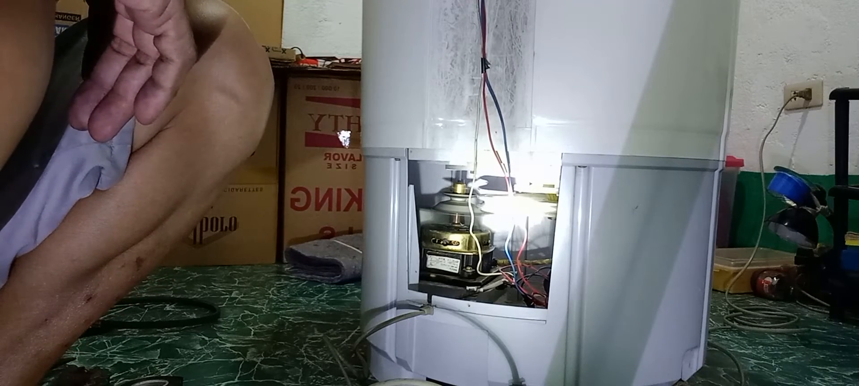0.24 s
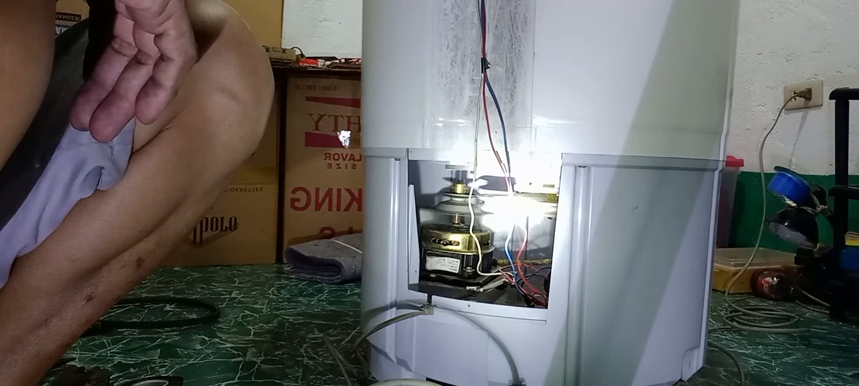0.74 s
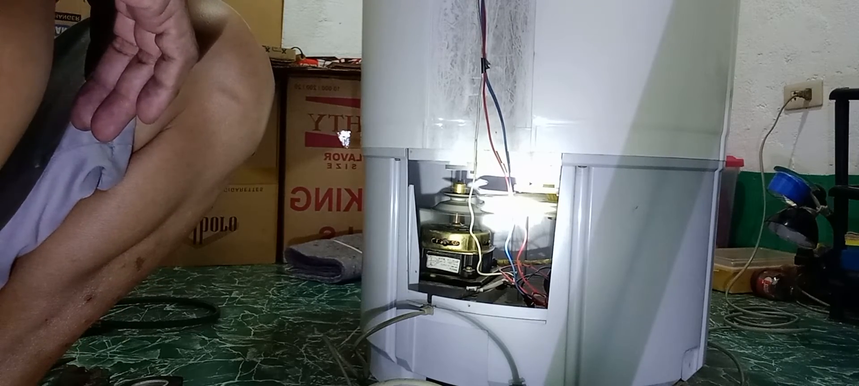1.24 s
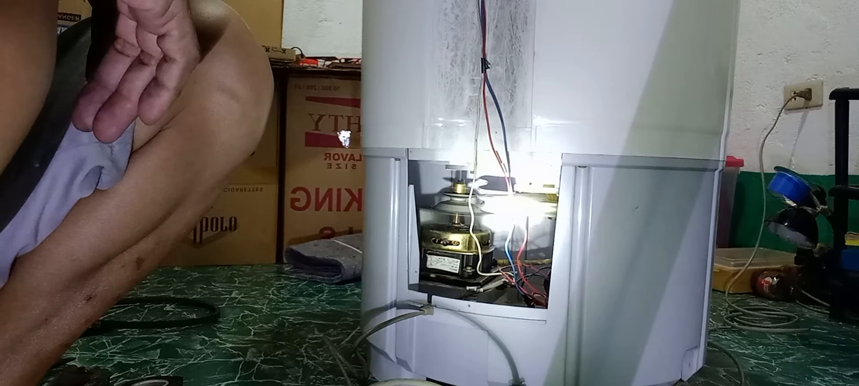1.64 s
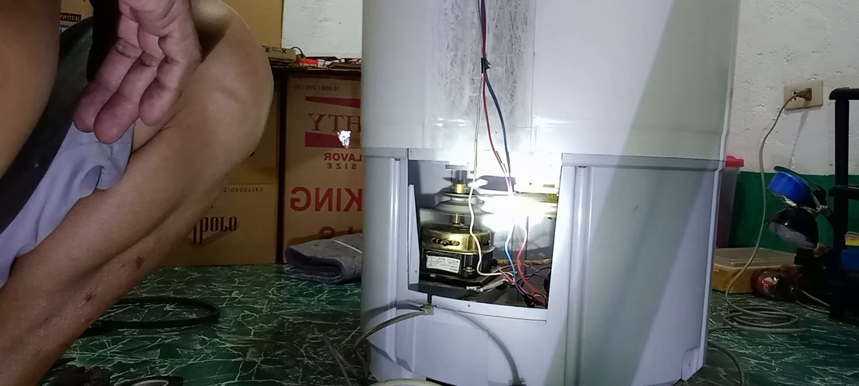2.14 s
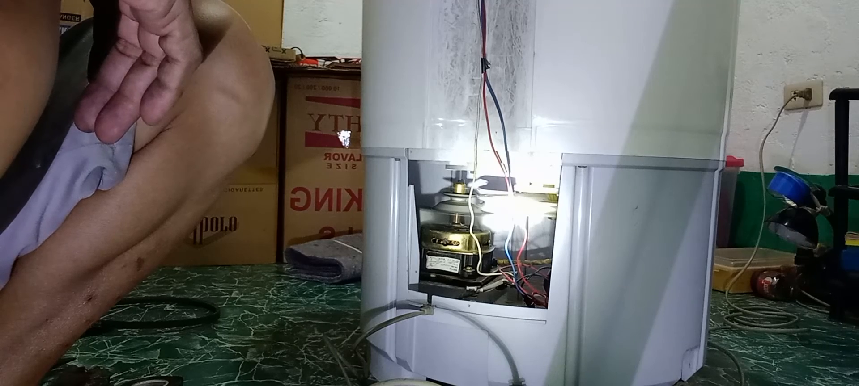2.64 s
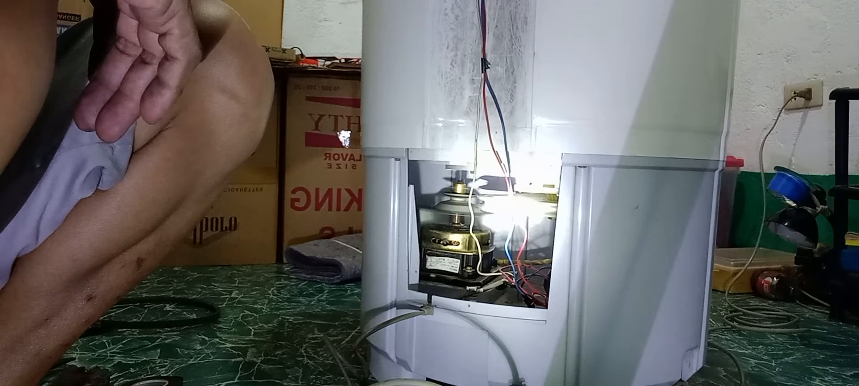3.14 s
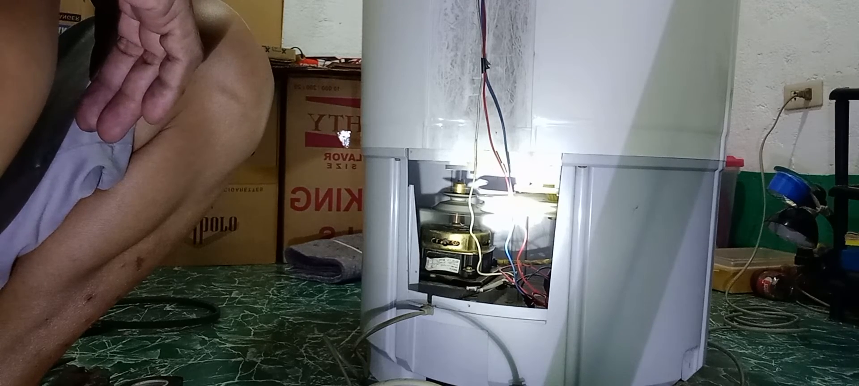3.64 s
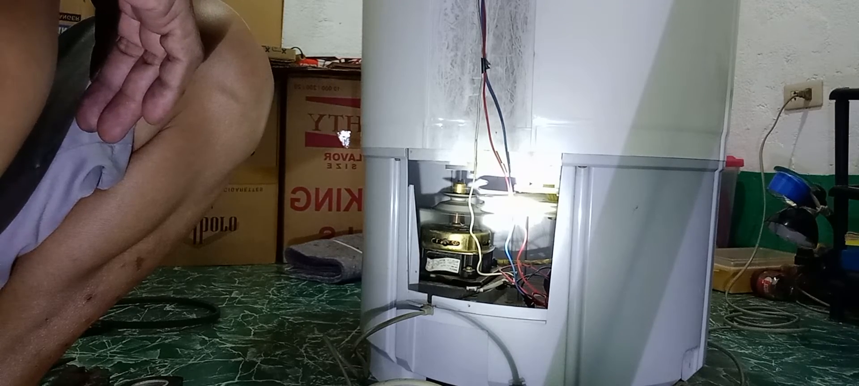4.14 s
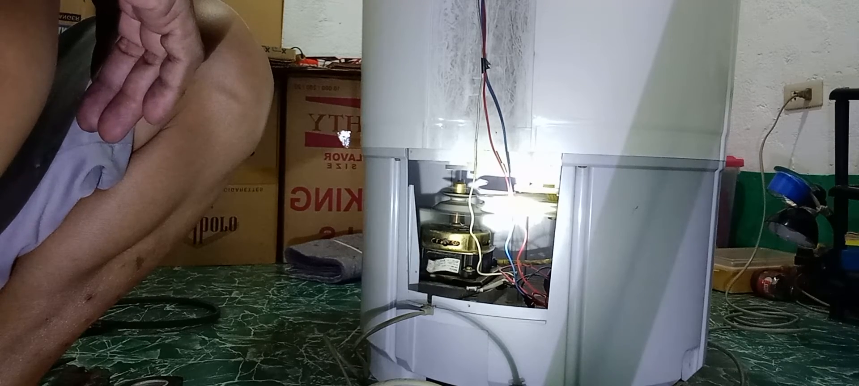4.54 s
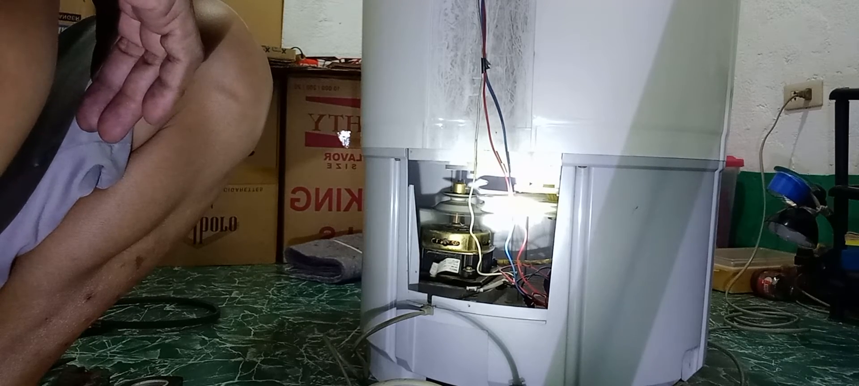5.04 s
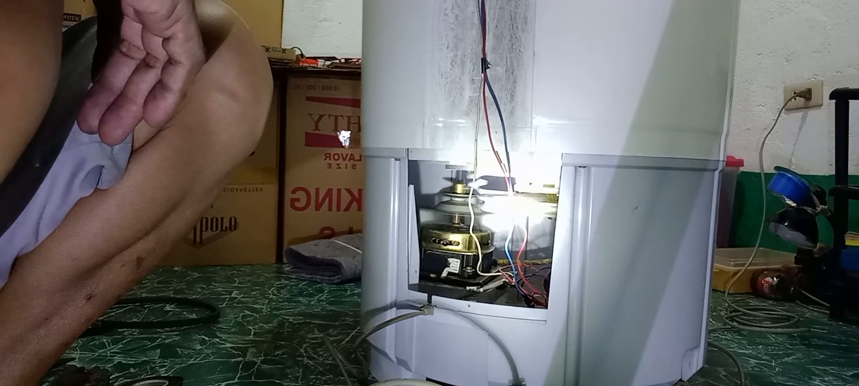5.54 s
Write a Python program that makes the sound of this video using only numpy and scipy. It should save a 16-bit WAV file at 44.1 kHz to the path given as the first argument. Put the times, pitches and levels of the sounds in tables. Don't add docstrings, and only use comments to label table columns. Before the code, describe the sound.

From 0 to about 2.75 seconds a bare washer motor, close and centred, hums deep and steady near 120 Hz, with weaker harmonics and a lightly pulsing bearing and fan whirr. Small dry ticks appear near 0.85 and 0.95 seconds, with fainter ones later. At 2.75 the power cuts: the hum collapses into a short, beating panel ring of about a third of a second, while a soft low whirr coasts down. Now a vehicle outside is heard, its slipping belt making fast downward chirps around 1.3 to 1.7 kHz, echoed by street walls, with a short loud squeal near 3.85. Engine drone wanders low beneath. Faint high brake squeaks come around 3.3, 3.8 and 4.0, with a clearer one at 4.5. After about 4.1 the vehicle rises sharply, the chirps quickening, road rumble booming in the shop and tyre hiss spreading wide, closest from 5.2 to the end near 5.8. The motor does not restart.

```python
import sys
import numpy as np
from scipy import signal
from scipy.fft import next_fast_len
from scipy.io import wavfile
from scipy.ndimage import uniform_filter1d

SR = 44100
rng = np.random.default_rng(int(sys.argv[2]) if len(sys.argv) > 2 else 0)


def to_linear_factor(level_db):
    exponent = np.asarray(level_db, float) / 20
    return 10 ** exponent


def unload_audio(sound):
    columns = np.transpose(np.atleast_2d(sound))
    steps = np.round(np.clip(columns, -1, 1) * 32767)
    wavfile.write(sys.argv[1], SR, steps.astype(np.int16))


N = 255780
T = np.arange(N) / SR
HUM_HZ = 119.83
POWER_OFF_S = 2.756

# t/s, level/dB compared with about its closest
APPROACH = [
    (0, -23),
    (2.8, -23),
    (3.5, -23.5),
    (3.9, -24.5),
    (4.16, -14.5),
    (4.55, -6),
    (4.85, -3),
    (5.22, 1),
    (5.8, 1.5),
]


def rms_one(x):
    return x / np.sqrt(np.mean(x ** 2) + 1e-20)


def in_time(rows):
    seconds, *columns = np.transpose(rows)
    return [np.interp(T, seconds, column) for column in columns]


def at_hz(points, hz):
    table_hz, value = np.array(points).T
    return np.interp(np.log(hz), np.log(table_hz), value)


def bell(centre_s, half_s):
    return np.exp(-((T - centre_s) / half_s) ** 2)


def drift(rate_hz):
    r = np.exp(-80 * np.pi * rate_hz / SR)
    white = rng.standard_normal(N // 40 + 2002)
    slow = signal.lfilter([1], [1, -2 * r, r * r], white)[2000:]
    return np.interp(np.arange(N) / 40, np.arange(len(slow)), rms_one(slow))


def resonate(x, hz, width_hz):
    r = np.exp(-np.pi * width_hz / SR)
    feed = np.array([1, 0, -1]) * (1 - r * r) / 2
    back = [1, -2 * r * np.cos(2 * np.pi * hz / SR), r * r]
    return signal.lfilter(feed, back, x + 1e-18)


def whistle(hz, width_hz, shape):
    once = resonate(rng.standard_normal(shape), hz, width_hz)
    return rms_one(resonate(once, hz, width_hz))


def pair(mid, side, alike):
    alike = np.clip(alike, 0, 1)
    shared = np.sqrt(1 + alike) * mid
    unshared = np.sqrt(1 - alike) * side * [[1], [-1]]
    return (shared + unshared) / np.sqrt(2)


def bands():
    edges = 30 * 2 ** np.arange(0, 9.2, 1 / 3)
    white = rng.standard_normal((2, 2, N))
    for k, (low, high) in enumerate(zip(edges, edges[1:])):
        band = signal.butter(2, [low, high], "band", fs=SR, output="sos")
        mid, side = signal.sosfilt(band, white[k % 2])
        flicker = to_linear_factor(1.7 * drift(51.0))
        yield np.sqrt(low * high), mid, side, flicker


def after_cut(t60_s):
    return to_linear_factor(-60 * np.maximum(T - POWER_OFF_S, 0) / t60_s)


def motor():
    # hum multiple, shaft multiple, level/dB rms, wobble/dB
    hum_lines = [(1, 0, -9.5, -0.07), (1, 1, -30, 0.5), (2, -1, -46.5, 3), (1, 4, -48, -1.5),
                 (2, 0, -54.5, 6.5), (2, 1, -41, -0.5), (2, 2, -50, 3.5), (3, -1, -44.5, -3),
                 (3, 0, -31.5, 0.7), (3, 1, -50.5, 2.5), (3, 2, -49.5, 3), (4, -1, -49.5, 4),
                 (4, 0, -50.5, 3.5), (4, 1, -50.5, 3.5), (5, -1, -59.5, 4), (5, 0, -65.5, 2.5),
                 (5, 1, -57.5, 0), (6, -2, -63, -1.5), (6, -1, -65, 7.5), (6, 0, -63, 3.), (7, -3, -58, 2.),
                 (7, -2, -60, 3.), (7, -1, -66, 3.), ]
    hum_lines = hum_lines + [(7, 0, -47.5, 1.5), (7, 1, -62, 3.), (8, 0, -68, 3.)]
    # f/Hz, share, 60 dB fade time t/s
    panels = [(96.6, 0.53, 0.35), (120.5, 0.55, 0.24)]
    shaft_hz = 29.53
    since_cut = np.maximum(T - POWER_OFF_S, 0)
    out = np.zeros((2, N))
    for hum, shaft, level_db, wobble_db in hum_lines:
        hz = hum * HUM_HZ + shaft * shaft_hz
        if hz == HUM_HZ:
            held = 2 * np.pi * hz * np.minimum(T, POWER_OFF_S) + .14
            line = np.zeros(N)
            for panel_hz, share, t60_s in panels:
                line += share * after_cut(t60_s) * np.sin(held + 2 * np.pi * panel_hz * since_cut)
            line = np.array([line, line])
        else:
            phase = 2 * np.pi * hz * T + rng.uniform(0, 2 * np.pi)
            skew = (hz / 900) ** 2 * rng.uniform(-1.3, 1) * np.array([[1], [-1]])
            fade = to_linear_factor(-60 * np.maximum(T - POWER_OFF_S + .02, 0) / .17)
            line = fade * np.sin(phase + .05 * hum * drift(2.5) + skew)
        out += np.sqrt(2) * to_linear_factor(level_db + wobble_db * drift(9.1)) * line
    return out * to_linear_factor(np.array([[.45], [-.45]]))


def whirr(noise):
    # f/Hz, level/dB per Hz
    spectrum = [(30, -49), (55, -23.5), (75, -5.5), (130, -3.5), (200, -17.5), (300, -27.5), (450, -20),
                (560, -32.5), (900, -22), (1150, -38.5), (2100, -45.5), (3000, -42), (5500, -49.5),
                (8000, -67.5)]
    # f/Hz, left-right likeness (0-1)
    likeness = [(30, 0.47), (60, 1), (250, 0.44), (600, 0.81), (1400, 0.29), (6000, 0.079), (15000, 0.039)]
    # f/Hz, width/Hz, level/dB
    frame_peaks = [(1730, 250, -59.5), (2513, 170, -64.5), (3880, 660, -67.5), (4570, 950, -74.5),
                   (7600, 700, -87)]
    stop_t60_s, coast_t60_s = 0.14, 2.5
    broad = 0
    for hz, mid, side, flicker in noise:
        broad = broad + to_linear_factor(at_hz(spectrum, hz)) * flicker * pair(mid, side, at_hz(likeness, hz))
    broad = to_linear_factor(-38.5) * rms_one(broad)
    frame = sum(to_linear_factor(db) * pair(*whistle(hz, width, (2, N)), 0.79) for hz, width, db in frame_peaks)
    pulse = 1 + 0.14 * np.sin(2 * np.pi * HUM_HZ * T)
    low_band = signal.butter(3, [170, 550], "band", fs=SR, output="sos")
    lows = signal.sosfilt(low_band, broad)
    coast = to_linear_factor(5.5) * lows * after_cut(coast_t60_s) * (1 - after_cut(stop_t60_s))
    return (broad + frame) * after_cut(stop_t60_s) * pulse + coast


def belt():
    # t/s, turns done
    pulley = [(0, -33.6), (2.798, 0), (3.141, 4), (3.797, 12), (4.16, 17), (4.5, 22), (5.055, 30),
              (5.423, 35), (5.858, 41)]
    # share of turn, centre pitch (0-1), level/dB
    chirp = [(0, .95, -7), (.1, .85, -1), (.3, .55, 0), (.5, .35, 0), (.7, .2, -3), (.8, .2, -14),
             (.93, .2, -13), (1, .95, -7)]
    # centre t/s, half length t/s, level/dB
    hard_slips = [
        (2.976, .22, -0.5),
        (3.849, .09, 5),
    ]
    # centre t/s, half length t/s, level/dB
    grip = (3.48, .25, -5)
    # f/Hz, width/Hz, level/dB
    cover = [(1367, 150, 4), (1650, 270, 0.5)]
    # delay t/s, level/dB
    echoes = [(.009, -5), (.016, -7), (.027, -10), (.041, -14), (.083, -14)]

    turns, = in_time(pulley)
    turn = turns % 1
    hard = sum(bell(s, half) ** 2 for s, half, db in hard_slips)
    low_hz = 1300 + (1530 - 1300) * hard
    turns_per_s = uniform_filter1d(np.gradient(turns) * SR, size=SR // 4)
    high_hz = 1710 + 35.67 * (turns_per_s - 12)

    share, pitch, chirp_db = np.transpose(chirp)
    stroke = 5 * turn % 1
    sweep = 1.3 + (.2 - 1.3) * hard
    place = np.interp(turn, share, pitch) + sweep * (.5 - stroke) + .08 * drift(25)
    hz = low_hz + (high_hz - low_hz) * np.clip(place, 0, 1) + 20 * drift(60)
    phase = 2 * np.pi * np.cumsum(hz) / SR

    stroke_db = -4 * np.cos(2 * np.pi * stroke) + 2 * drift(70)
    overtone = np.sin(2 * phase) * np.cos(np.pi * (turn - .28)) ** 6
    octave = to_linear_factor(-2) * resonate(overtone, 3220, 200)
    tone = to_linear_factor(np.interp(turn, share, chirp_db) + stroke_db) * (np.sin(phase) + octave)
    tone = tone + sum(to_linear_factor(db + 5.5) * resonate(tone, ring_hz, width) for ring_hz, width, db in cover)

    walls = rng.standard_normal((2, SR // 3)) * to_linear_factor(-34 - 60 * T[:SR // 3] / .3)
    walls[:, 0] = 1
    for delay_s, db in echoes:
        samples = (delay_s * SR * np.array([1, 1.19])).astype(int)
        walls[[0, 1], samples] = to_linear_factor(db)
    heard = signal.fftconvolve(tone[None], walls, axes=1)[:, :N]

    near_db, = in_time(APPROACH)
    level_db = -36.5 + 0.84 * near_db
    level_db = level_db + sum(db * bell(s, half) for s, half, db in hard_slips + [grip])
    return to_linear_factor(level_db) * rms_one(heard)


def drone():
    # f/Hz, pitch wander/Hz
    engine_tones = [(76, 8.5), (116, 15), (153, 11)]
    tone_levels = [-29, -24, -31.5]
    # centre t/s, half length t/s, level/dB
    tone_surges = [
        [(3.19, 0.091, 2), (3.88, 0.19, 1.5), (4.13, 0.043, 2), (4.32, 0.051, -3), (4.67, 0.067, 3.5),
         (4.8, 0.047, -3), (4.97, 0.14, -3), (5.47, 0.03, -2), (5.7, 0.048, -5)],
        [(2.97, 0.025, 4), (3.13, .06, 0), (3.25, 0.069, -5), (3.88, 0.019, 7), (4.23, 0.019, -5),
         (4.66, 0.063, 0.5), (4.78, 0.034, 4), (4.97, 0.055, 5.5), (5.16, 0.054, -3.5), (5.31, 0.018, -4),
         (5.6, .07, -4)],
        [(3.31, 0.066, -7), (3.7, 0.022, -7), (3.92, 0.17, 4), (4.28, 0.064, 0.5), (4.46, 0.1, 0),
         (4.9, 0.084, -4), (5.2, .1, 1), (5.37, 0.017, 2.5), (5.65, 0.047, -1)],
    ]
    near_db, = in_time(APPROACH)
    out = 0
    for (hz, wander_hz), level_db, surges in zip(engine_tones, tone_levels, tone_surges):
        lumps = to_linear_factor(-12) + sum(to_linear_factor(db) * bell(s, half) for s, half, db in surges)
        wave = signal.hilbert(whistle(hz, wander_hz, (2, next_fast_len(N))))[:, :N]
        steady = np.sqrt(2) * wave.real / (np.abs(wave) + .2)
        out = out + to_linear_factor(level_db + 0.74 * near_db) * lumps * pair(*steady, .97)
    return out * to_linear_factor(np.array([[1.1], [-1.1]]))


def street(noise):
    # f/Hz, level/dB per Hz
    spectrum = [(30, -54.5), (52, -41), (72, -10), (120, -9), (180, -13), (330, -26.5), (500, -24),
                (1200, -31.5), (2000, -31.5), (4000, -43), (6500, -48.5), (12000, -50), (15600, -48)]
    # f/Hz, left-right likeness (0-1)
    likeness = [(60, 1), (130, 0.88), (290, 0.93), (640, 0.15), (1400, 0.17), (3000, 0.033), (15000, 0.018)]
    # level/dB at the closest, share of the approach followed
    regions = [(-1.5, 0.67), (-1.5, 0.57), (3.5, 0.88), (0.2, 0.72)]
    # f/Hz, width/Hz, level/dB
    shop_booms = [(192.5, 49, -15.5), (230.5, 11, -7.5), (276, 41, -9), (331.6, 48, -8), (472, 75, -12.5)]
    # f/Hz, width/Hz, level/dB compared with the hiss
    tyre_peaks = [(3940, 150, -7.5), (7800, 270, -11), (9600, 230, -9), (12300, 350, -10.5)]
    road_db, tyre_db = -27, -57
    near_db, = in_time(APPROACH)
    swell_db = np.array([db + share * near_db for db, share in regions])
    road, boom, power = 0, 0, 0
    for hz, mid, side, flicker in noise:
        place = np.interp(np.log(hz), np.log([150, 420, 1100, 7500]), [0, 1, 2, 3])
        weights = np.maximum(1 - np.abs(place - np.arange(4)), 0)
        level = to_linear_factor(at_hz(spectrum, hz) + weights @ swell_db)
        road = road + level * flicker * pair(mid, side, at_hz(likeness, hz))
        power += to_linear_factor(2 * at_hz(spectrum, hz)) * np.var(mid)
    road = road * to_linear_factor(-4.0 + road_db) / np.sqrt(power)
    for hz, width, db in shop_booms:
        boom = boom + to_linear_factor(db + 0.5 - 5.0 + swell_db[1]) * pair(*whistle(hz, width, (2, N)), 1.0)
    rings = sum(to_linear_factor(db + tyre_db + swell_db[3]) * whistle(hz, width, (2, N)) for hz, width, db in tyre_peaks)
    return (road + to_linear_factor(road_db) * boom) * to_linear_factor(np.array([[.8], [-.8]])) + rings


def brake_squeaks():
    whistles = [
        (3.286, 0.081, 10750, 9000, -69.5),
        (3.319, 0.13, 11200, 258, -66),
        (3.759, .1, 11300, 9070, -71.5),
        (3.762, 0.088, 10000, 400, -69),
        (3.965, 0.17, 12040, 6000, -69.5),
        (3.966, .12, 11260, 600, -67),
        (4.467, 0.086, 12300, 900, -58.5),
        (4.459, 0.057, 10050, 900, -64),
    ]
    out = np.zeros((2, N))
    for start_s, length_s, hz, width_hz, db in whistles:
        at, size = int(start_s * SR), int(length_s * SR)
        swell = np.sin(np.pi * np.arange(size) / size) ** 0.35
        out[:, at:at + size] += to_linear_factor(db) * whistle(hz, width_hz, (2, size)) * swell
    return out


def creaks():
    # t/s, peak level/dB
    ticks = [
        (0.8471, -50.5),
        (0.9474, -48),
        (1.792, -64),
        (2.0567, -54.5),
        (2.7165, -55.5),
        (3.2503, -56),
        (4.039, -55),
        (4.228, -50),
    ]
    out = np.zeros((2, N))
    for start_s, db in ticks:
        at = int(start_s * SR)
        burst = rng.standard_normal((2, 300)) * to_linear_factor(-60 * T[:300] / 0.0067)
        out[:, at:at + 300] += to_linear_factor(db + 3) * resonate(burst, 9000, 10000)
    return out


def scene():
    noise = list(bands())
    far = street(noise) + drone()
    left_lag_s = .00038
    far[0] = np.interp(T - left_lag_s, T, far[0])
    return motor() + whirr(noise) + belt() + far + brake_squeaks() + creaks()


def band_limit(x):
    return signal.sosfilt(signal.butter(12, 15670, fs=SR, output="sos"), x)


def record(dry):
    hiss = resonate(rng.standard_normal(dry.shape), 7200, 12000)
    return band_limit(dry + to_linear_factor(-71.0) * hiss)


dry = scene()
out = record(dry)
unload_audio(out)
```